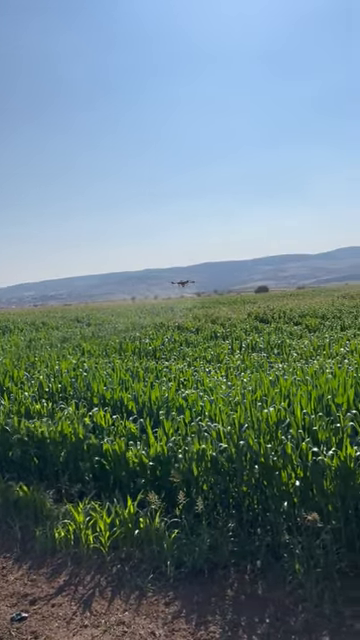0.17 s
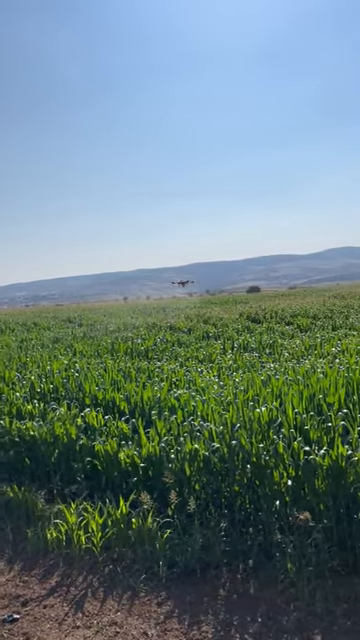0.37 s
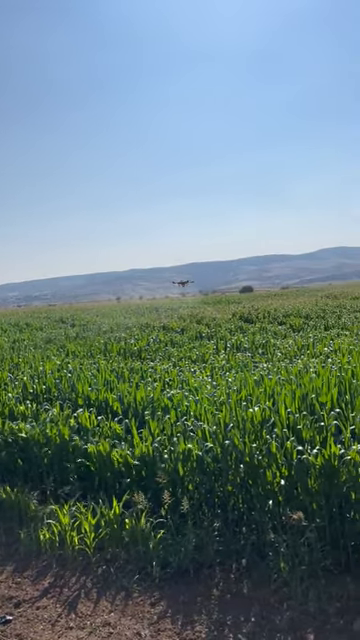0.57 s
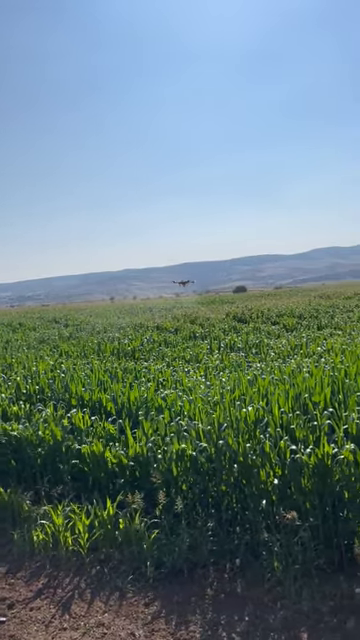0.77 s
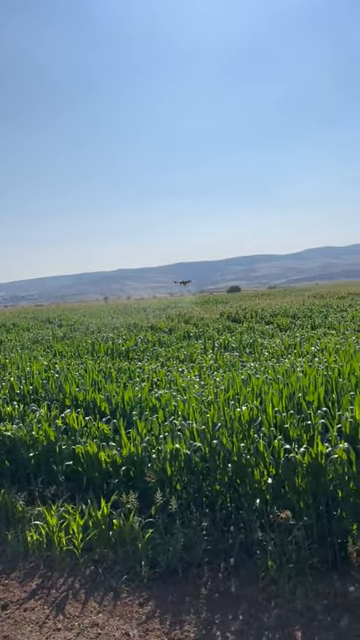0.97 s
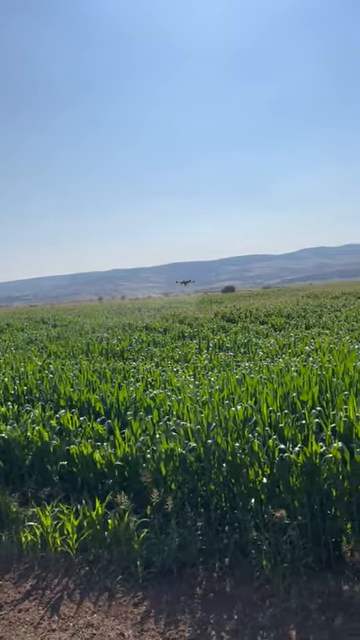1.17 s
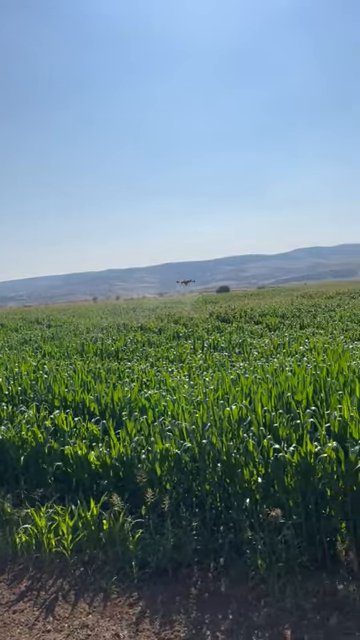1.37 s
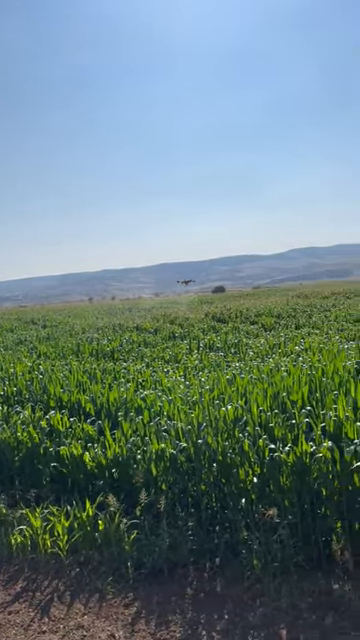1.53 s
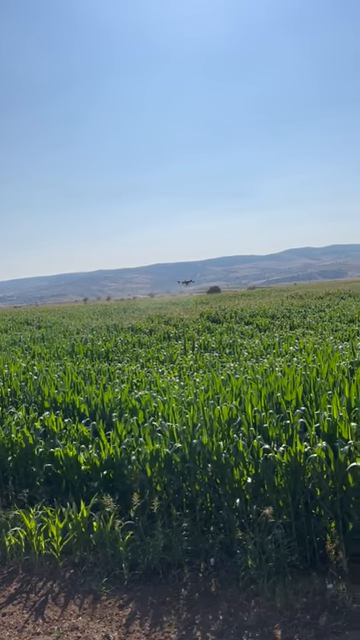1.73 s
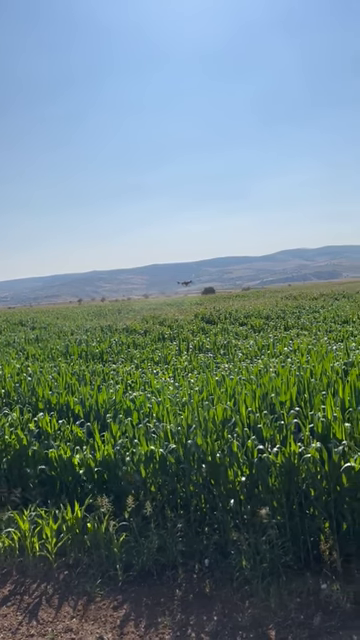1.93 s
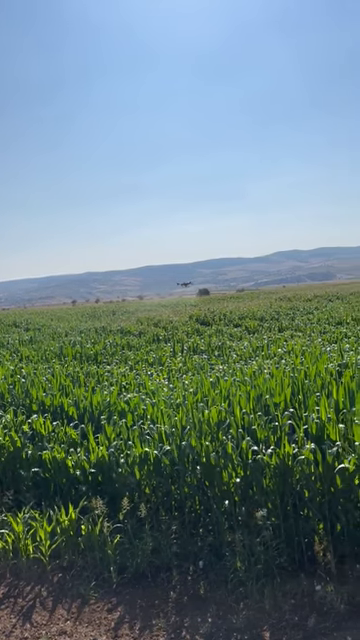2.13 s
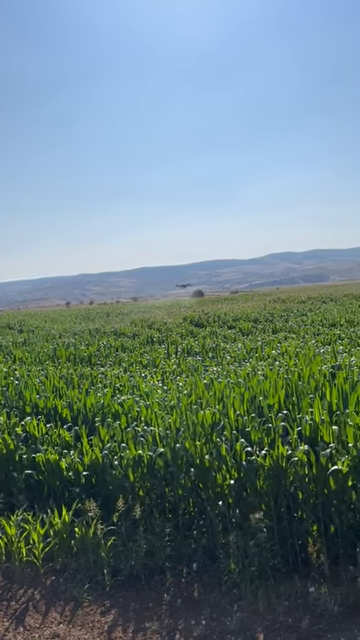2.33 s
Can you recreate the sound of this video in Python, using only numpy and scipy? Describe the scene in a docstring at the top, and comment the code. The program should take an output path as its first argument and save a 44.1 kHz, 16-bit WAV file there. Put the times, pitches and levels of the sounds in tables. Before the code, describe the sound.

Steady distant multirotor buzz and rushing air in an open field, heard through a handheld stereo microphone; low wind thumps dominate early, then clear, leaving the drone, a faint whine and soft leaf swishes.

```python
"""Over a maize field, a large multirotor drone hovers far off, heard through two closely spaced microphone ports.
Its rotors give a low, wavering hum built from harmonics, and a rush of air made from chopped, coloured noise.
Its motors add a thin whine made from sine waves; faint, thin high tones flutter above it.
In the first second a gust buffets the microphone: rumbling noise and short low pulses.
The leaves hiss and swish in the breeze, as uneven noise."""
import sys
import numpy as np
from scipy import signal
from scipy.fft import irfft
from scipy.io import wavfile
from scipy.ndimage import uniform_filter1d

SR = 44100
rng = np.random.default_rng(int(sys.argv[2]) if len(sys.argv) > 2 else 0)


def unload_wav(signal):
    """Save mono or channel-first audio to the path in sys.argv[1] as 16-bit WAV at rate SR, clipped to [-1, 1]."""
    wavfile.write(
        sys.argv[1],
        SR,
        np.round(np.clip(np.atleast_2d(signal).T, -1, 1) * 32767).astype(np.int16),
    )


N = 105840
T = np.arange(N) / SR  # time of each sample, s
HZ = np.fft.rfftfreq(N, 1 / SR)  # frequency of each spectrum bin, Hz

# Noise colour of the leaf hiss, shape only: frequency_hz, density_db (per Hz)
LEAF_COLOUR = [(200, -25), (2000, -5), (4500, 2.5), (6500, 0.5), (7900, 2), (8900, -6), (12700, -4.5),
               (13500, -23), (15000, -7), (16000, -16)]
# Level of the leaf hiss, before its flutter: time_s, level_db
LEAF_LEVEL = [(0, -62.5), (.6, -62.5), (1.0, -64), (1.17, -65.5), (1.33, -60.5), (1.6, -62), (1.85, -66.5),
              (2.05, -68), (2.35, -64)]
# Short leaf swishes: centre_s, half_length_s, level_db
LEAF_SWISHES = [(0.856, 0.037, -54.5), (.91, 0.022, -55.5), (1.04, 0.022, -58.5), (1.885, 0.042, -55.5)]
# Noise colour of the swishes, shape only: frequency_hz, density_db (per Hz)
SWISH_COLOUR = [(100, 3), (500, 2), (1500, -1), (4000, 0.5), (8000, -5), (12500, -11.5), (16000, -18)]
# Wind pressure on the microphone between the buffets: time_s, level_db
WIND_LEVEL = [(0, -55), (.17, -49.5), (.3, -42.5), (.45, -33.5), (.62, -38), (.72, -44), (.82, -52.5),
              (.88, -64), (1.0, -65), (1.1, -61.5), (1.5, -66), (1.75, -60), (1.95, -64.5), (2.4, -60.5)]
# Single buffets of wind: centre_s, half_length_s, peak_level_db, pitch_hz
WIND_BUFFETS = [(0.226, 0.012, -31, 100.8), (0.236, 0.016, -41.5, 57.1), (0.298, 0.011, -28, 71.8),
                (0.34, 0.01, -47.5, 265), (0.344, 0.014, -29.5, 135.2), (.352, 0.025, -21.5, 63.33),
                (0.41, 0.0088, -38.5, 155), (.422, .015, -23.5, 71.5), (.46, 0.011, -32.5, 70.3),
                (0.483, 0.023, -29, 88.33), (0.503, 0.011, -35.5, 140), (0.519, 0.012, -25, 67.65),
                (.562, 0.019, -28.5, 62.54), (0.586, 0.018, -38.5, 125), (0.608, 0.021, -26.5, 67.75),
                (0.668, .013, -34.5, 118), (0.686, 0.016, -38, 60), (0.711, .023, -39.5, 112.8),
                (0.756, 0.02, -40, 90), (0.802, 0.032, -49, 64.7), (0.823, .016, -51, 124.8),
                (1.048, 0.016, -52, 65), (1.193, 0.011, -53, 84.7), (1.438, 0.021, -53, 72.2),
                (1.611, 0.019, -51, 55.4), (2.244, 0.032, -56, 49.9)]
# Noise colour of the wind rumble, shape only: frequency_hz, density_db (per Hz)
WIND_COLOUR = [(15, -50), (30, -19), (44, -7.5), (66, 0), (85, -10), (125, -7), (165, -24.5), (230, -22),
               (400, -64), (1500, -90)]
# Faint, thin high tones, before their flutter: pitch_hz, left_db, right_db
FAINT_HIGH_TONES = [(7970, -85, -88), (8105, -86, -89), (8908, -82, -91)]
# Pitch and relative level of the motor whine: time_s, pitch_hz, level_db
WHINE_COURSE = [(0, 1328, 0.5), (.5, 1328, 0), (.63, 1327, -1.5), (.8, 1334, 0), (1.33, 1324, 0),
                (1.5, 1344, -1.5), (1.85, 1335, -0.5), (2.4, 1328, 0)]
# Partials of the whine: multiple (of the pitch), left_db, right_db, left_phase_lead_rad
WHINE_PARTS = [(.5, -65.5, -64.5, -0.88), (1, -58, -71, -0.87)]
# Brief surges of the rotor rush: centre_s, half_length_s, peak_level_db, pitch_hz
RUSH_SURGES = [(0.218, 0.028, -54, 713), (0.445, 0.058, -52, 742), (0.73, 0.035, -54, 736),
               (0.959, 0.026, -54.5, 725), (1.05, 0.024, -53, 486), (1.169, 0.028, -47.5, 480),
               (1.636, .008, -57, 950), (1.766, 0.016, -50.5, 479), (1.878, 0.039, -55, 531)]
# Noise colour of the rotor rush, shape only: frequency_hz, density_db (per Hz)
RUSH_COLOUR = [(25, -29), (60, -21), (170, -4.5), (330, -4), (480, 3), (620, -2), (780, 1.5), (930, -5.5),
               (1100, -3), (1700, -9), (2300, -11), (3200, -11), (5200, -18.5), (6500, -31.5),
               (9000, -29.5), (16000, -74)]
# Relative level of the rotor rush: time_s, level_db
RUSH_LEVEL = [(0, 0), (.4, 1.3), (.85, 0.2), (1.15, -0.9), (1.45, -1.6), (1.9, -0.3), (2.4, -1.5)]
# How often a blade passes, for the leading rotor: time_s, rate_hz
BLADE_PASS_RATE = [(0, 65.4), (.15, 65.4), (.35, 66.29), (.65, 65.68), (.87, 64.05), (1.15, 65.25),
                   (1.55, 64.8), (1.8, 64.07), (1.95, 64.68), (2.2, 63.7), (2.4, 64.1)]
# Harmonics of the blade-pass rate, before rotor and hum levels: multiple, level_db
HUM_HARMONICS = [(1, -69.5), (2, -69), (3, -63.5), (4, -63), (5, -66), (6, -61), (7, -59.5), (8, -60),
                 (9, -70), (10, -67), (11, -65.5), (12, -69.5)]
# Relative level of the whole hum: time_s, level_db
HUM_SWELL = [(0, 2.5), (.55, 1.5), (.74, 1.5), (.87, -3), (1.0, 0.5), (1.18, 1), (1.28, -1), (1.6, -3),
             (1.82, -5), (2.1, -3.5), (2.4, -5.5)]
# The rotors: speed_offset_share, relative_level_db, speed_drift_share
ROTOR_SET = [(0, 0.5, .0025), (-.012, -8.5, 0.0093), (.018, -9.5, 0.0093), (-.035, -10, 0.0126)]
# Field noise in the two channels: frequency_hz, likeness_0_to_1, left_minus_right_db
CHANNEL_MATCH = [(60, 1, -2), (400, 1, 2.5), (780, 0.7, -1), (1010, 0.46, -10), (1600, 0.63, -1),
                 (3220, 0.58, -3), (4300, 0.46, -3), (5030, 1, -1.5), (5300, 1, 1.5), (6660, 1, 0.5),
                 (6600, 0, -1), (7400, 1, -0.5), (9050, 0.34, -0.5), (15000, 0.45, 0.5)]
# Phase of the left channel ahead of the right for noise, by frequency: frequency_hz, phase_rad
CHANNEL_PHASE = [(20, 3), (300, -0.4), (600, -1.7), (1150, -2.21), (1600, 0), (2500, 2), (3500, 1.74),
                 (4500, 0.77), (5200, 1.5), (5600, 3), (6400, 3), (7500, 7), (8700, 4.5), (10500, 8.5),
                 (12200, 6.6), (13500, 9.5), (16000, 9)]


def amp(db):
    """Turns decibels into gain."""
    return 10 ** (np.asarray(db) / 20)


def unit(x):
    """Scales a signal to rms 1."""
    return x / np.sqrt(np.mean(abs(x) ** 2) + 1e-20)


def curve(points):
    """Joins the points of a time table with straight lines."""
    return np.interp(T, *np.transpose(points))


def read(points, axis=1):
    """Reads one column of a frequency table, joined by lines on a log frequency axis."""
    table = np.transpose(points)
    return np.interp(np.log(HZ + 1), np.log(table[0] + 1), table[axis])


def white():
    """Makes a random spectrum, equally strong at all frequencies on average."""
    return rng.standard_normal(len(HZ)) + 1j * rng.standard_normal(len(HZ))


def wander(rate_hz):
    """Makes a smooth random movement of rms 1, mostly slower than the given rate."""
    slow = white() * (HZ > 0) / (1 + (HZ / rate_hz) ** 4)
    return unit(irfft(slow, N))


def swells(rows):
    """Adds up bell-shaped rises of level."""
    return sum(amp(db) * np.exp(-((T - s) / half) ** 2) for s, half, db in rows)


def field_noise(colour):
    """Makes coloured noise from the open field, partly alike in the two channels."""
    likeness = np.clip(read(CHANNEL_MATCH), 0, 1)
    tilt_db = read(CHANNEL_MATCH, axis=2) / 2  # half the level difference goes to each channel
    left = white()
    right = likeness * left + np.sqrt(1 - likeness ** 2) * white()
    right = right * np.exp(-1j * read(CHANNEL_PHASE))
    both = np.array([left * amp(tilt_db), right * amp(-tilt_db)])
    return unit(irfft(both * amp(read(colour)), N))


def patchy(x, depth_db):
    """Lets each band swell and fade by itself, in patches of about 500 Hz by 20 ms."""
    z = signal.stft(x, nperseg=256, noverlap=192)[2]
    patches = rng.standard_normal(z.shape[1:])  # shared by both channels
    patches = uniform_filter1d(patches, size=3, axis=0)  # along frequency
    patches = uniform_filter1d(patches, size=14, axis=1)  # along time
    uneven = z * amp(depth_db * unit(patches))
    return unit(signal.istft(uneven, nperseg=256, noverlap=192)[1][:, :N])


def leaves(flutter_db=0.5, grain_db=0.3, hiss_patchy_db=2.0, swish_patchy_db=1.8):
    """Leaves in the breeze give an uneven hiss from the field, and a few short, coarser swishes nearby."""
    hiss_level = amp(curve(LEAF_LEVEL) + flutter_db * wander(rate_hz=17))
    hiss = patchy(field_noise(LEAF_COLOUR), hiss_patchy_db) * hiss_level
    swish = patchy(field_noise(SWISH_COLOUR), swish_patchy_db) * swells(LEAF_SWISHES)
    return (hiss + swish) * amp(grain_db * wander(rate_hz=340))


def buffeting(apart_db=-15, evenness=0.27, blur_rad=0.39):
    """Turbulence rumbles on the microphone, and each large eddy swings the pressure at its own rate."""
    colour = amp(read(WIND_COLOUR))
    eddies = unit(np.fft.ifft(white() * colour, N))
    # Their running size over about 16 ms is used to even out the rumble a little
    size = np.sqrt(abs(uniform_filter1d(abs(eddies) ** 2, size=700)) + 1e-6)
    pressure = amp(curve(WIND_LEVEL))
    push = pressure * unit(eddies.real / size ** evenness)
    power = pressure ** 2
    phase_wander = blur_rad * wander(rate_hz=54)
    for s, half, db, hz in WIND_BUFFETS:
        swell = swells([(s, half, db)])
        swing = np.cos(2 * np.pi * (hz * T + rng.random()) + phase_wander)
        push = push + np.sqrt(2) * swell * swing  # root 2 makes the level an rms level
        power = power + swell ** 2
    # A weaker part pushes the two ports in opposite directions
    apart_noise = unit(irfft(white() * colour * np.sqrt(np.minimum(HZ, 200)), N))
    apart = amp(apart_db) * np.sqrt(power) * apart_noise
    return np.array([push + apart, push - apart])


def high_tones(fade_db=1.4):
    """Faint, thin sine tones that flutter in level and in phase."""
    out = np.zeros((2, N))
    for hz, left_db, right_db in FAINT_HIGH_TONES:
        level = amp([[left_db], [right_db]]) * amp(fade_db * wander(rate_hz=10.0))
        out += level * np.cos(2 * np.pi * hz * T + 0.95 * wander(rate_hz=5.4))
    return np.sqrt(2) * out


def motors(jitter_share=0.0014, fade_db=1.4):
    """A thin whine lifts as one motor speeds up, and flutters on the moving air."""
    s, hz, db = np.transpose(WHINE_COURSE)
    pitch_hz = np.interp(T, s, hz) * (1 + jitter_share * wander(rate_hz=48))
    angle = 2 * np.pi * np.cumsum(pitch_hz) / SR
    out = np.zeros((2, N))
    for k, left_db, right_db, lead in WHINE_PARTS:
        phase = round(2 * k) / 2 * angle  # whole or half multiples of the pitch
        level = amp(np.interp(T, s, db) + fade_db * wander(rate_hz=20))
        left = amp(left_db) * np.cos(phase + lead)
        right = amp(right_db) * np.cos(phase)
        out += level * np.array([left, right])
    return np.sqrt(2) * out


def surges(lead_rad=1.55, blur_rad=0.7, width_hz=37):
    """The moving air briefly lifts one narrow band of the rotor rush."""
    out = np.zeros((2, N))
    for s, half, db, hz in RUSH_SURGES:
        phase = 2 * np.pi * (hz * T + rng.random()) + blur_rad * wander(width_hz)
        out += swells([(s, half, db)]) * np.cos([phase + lead_rad, phase])  # left channel ahead
    return np.sqrt(2) * out


def rotors(lag_s=0.00039, fade_db=3.0, rush_db=-50, rush_patchy_db=2.0, chop_depth=0.105):
    """One steadier rotor leads the hum, weaker ones drift around it, and all chop their own rush of air."""
    hum, chop = np.zeros((2, N)), np.zeros(N)
    for offset, rotor_db, drift in ROTOR_SET:
        hz = curve(BLADE_PASS_RATE) * (1 + offset + drift * wander(rate_hz=4.33))
        turns = np.cumsum(hz) / SR + rng.random()  # blade passes so far
        chop += amp(rotor_db) * np.cos(2 * np.pi * turns)
        at_ports = np.array([turns - lag_s * hz, turns])  # the left port hears it later
        for k, db in HUM_HARMONICS:
            # Each harmonic fades in and out by itself on the moving air
            fade = unit(amp(fade_db * wander(rate_hz=6.6)))
            tone = np.cos(2 * np.pi * (round(k) * at_ports + rng.random()))
            hum += amp(db + rotor_db) * fade * tone
    rush_level = amp(rush_db + curve(RUSH_LEVEL) + 0.36 * wander(rate_hz=17))
    rush = rush_level * patchy(field_noise(RUSH_COLOUR), rush_patchy_db)
    chopped_rush = rush * (1 + chop_depth * unit(chop))
    return hum * np.sqrt(2) * amp(curve(HUM_SWELL)) + chopped_rush


def scene():
    """Adds the field, the wind, the high tones and the drone together."""
    return leaves() + buffeting() + high_tones() + motors() + surges() + rotors()


def record(dry, edge_hz=15800):
    """Limits the band with a steep low-pass filter, which takes away the very highest treble."""
    low_pass = signal.firwin(511, edge_hz, window=("kaiser", 9), fs=SR)
    return signal.oaconvolve(dry, low_pass[None], "same")


dry = scene()
out = record(dry)
unload_wav(out)
```